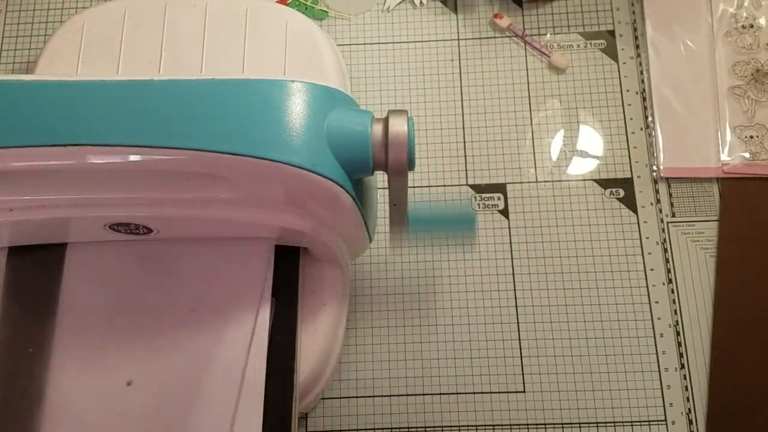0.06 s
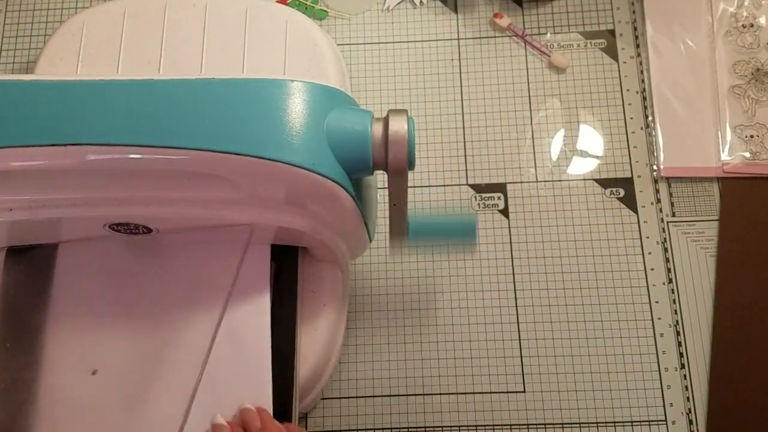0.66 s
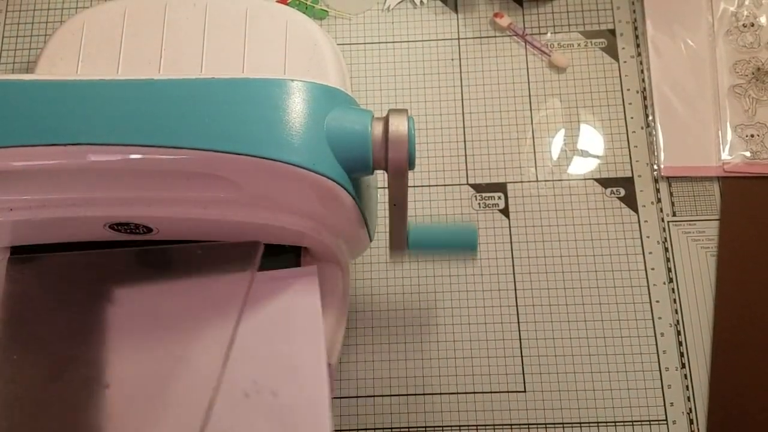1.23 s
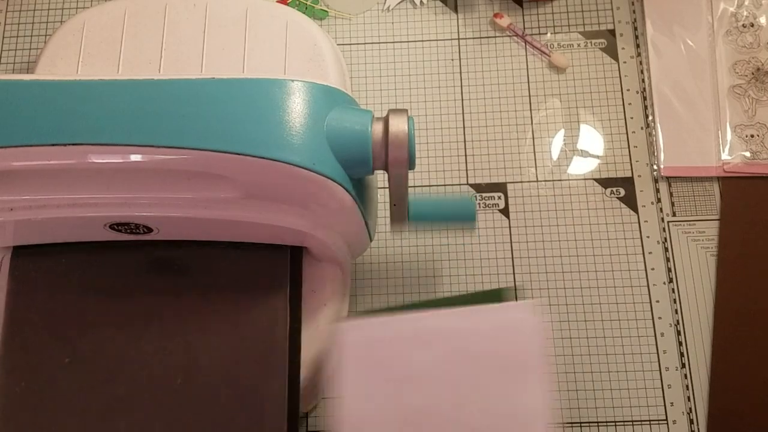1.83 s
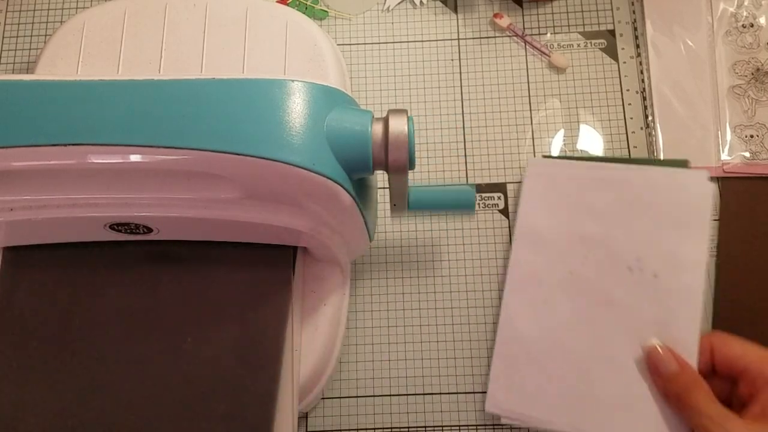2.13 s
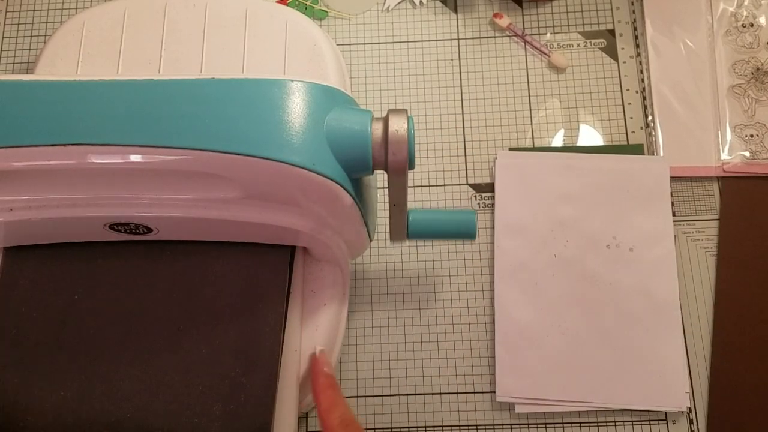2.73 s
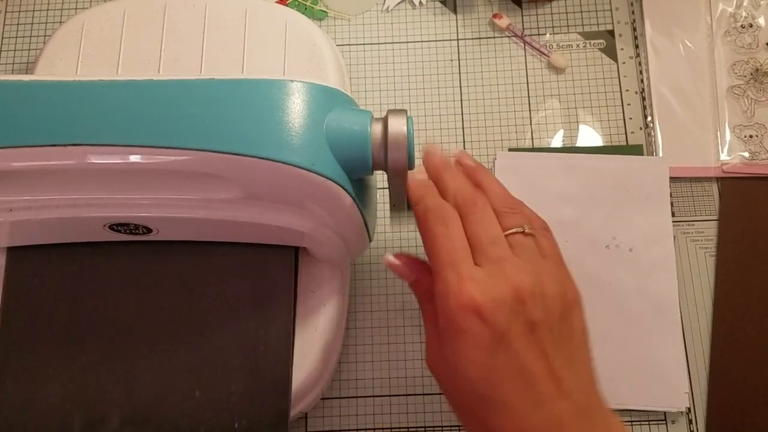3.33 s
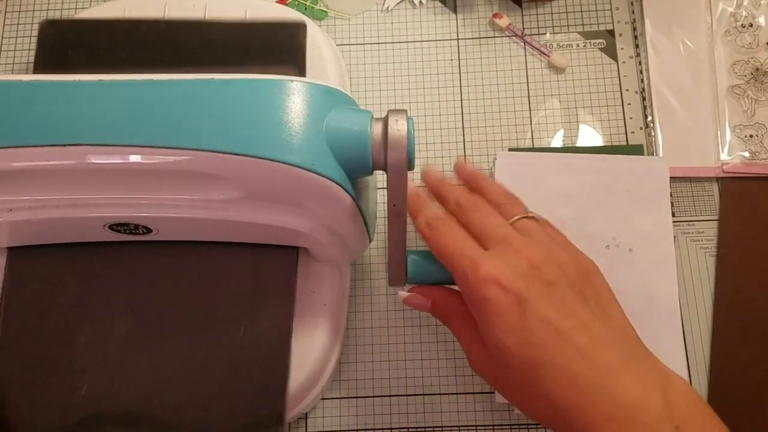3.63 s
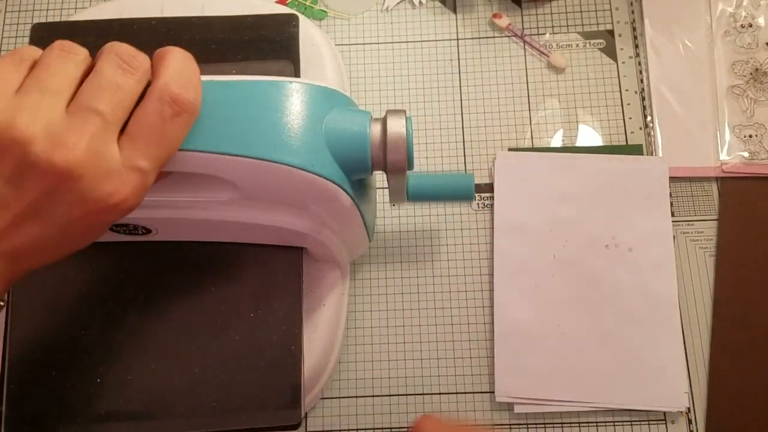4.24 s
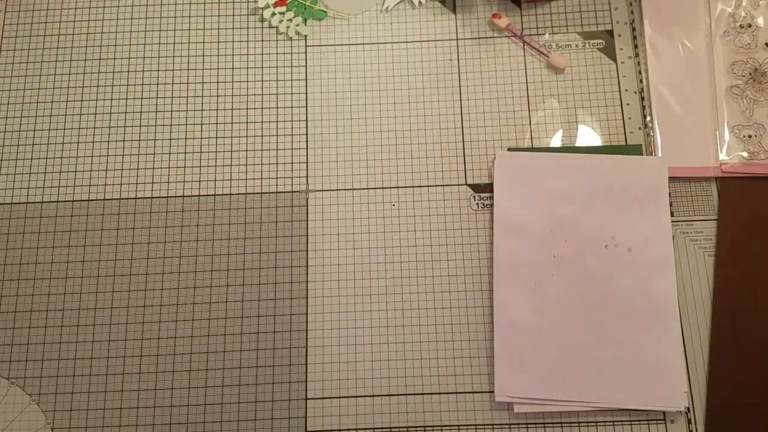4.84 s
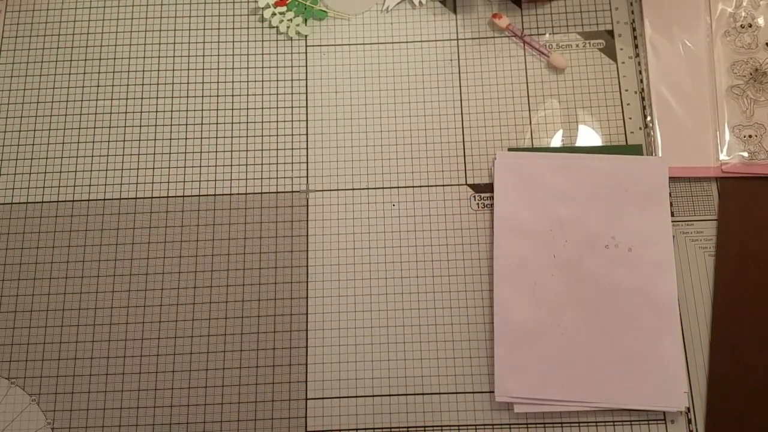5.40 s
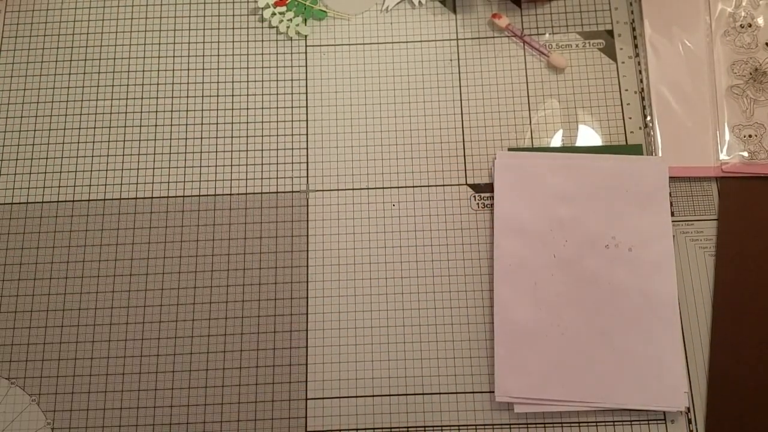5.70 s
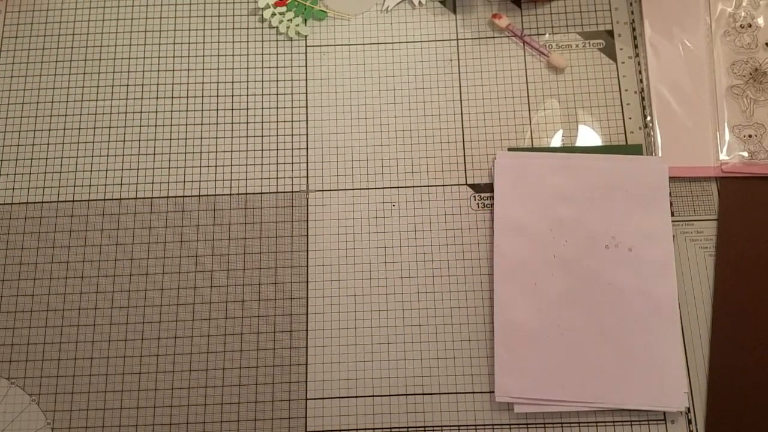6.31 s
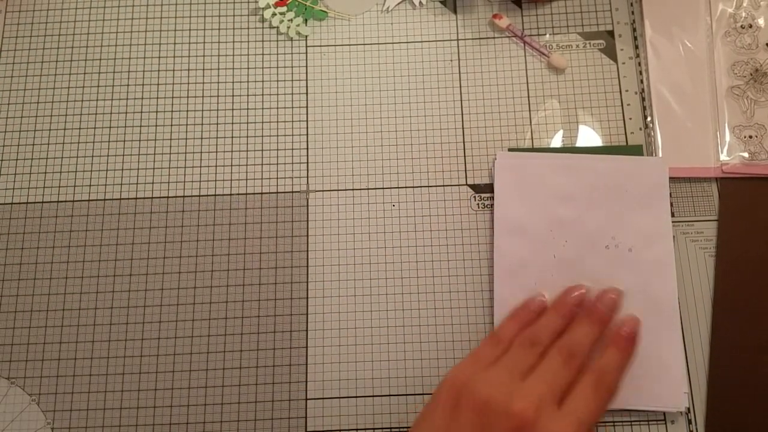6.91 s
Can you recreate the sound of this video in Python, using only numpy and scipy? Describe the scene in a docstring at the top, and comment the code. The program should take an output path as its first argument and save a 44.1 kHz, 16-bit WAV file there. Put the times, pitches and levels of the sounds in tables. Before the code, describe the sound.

A small hand-cranked die-cutting machine knocks and rattles as plates slide through, then is lifted and set down with a hollow clunk.

```python
"""A small hand-cranked die-cutting machine on a craft table in a furnished room.
Gear teeth knock the housing and the loose crank rattles as plates slide through the rollers in strokes.
Near 1.7 s card swishes out of the tray; near 3.5 s a plate drags, the housing groans, the table hums.
From 4.5 s the machine is lifted and carried to the left, rumbling in the hands.
It touches down at 5.65 s and lands foot by foot with a hollow clunk at 5.9 s; light clicks follow."""
import sys
import numpy as np
from scipy import signal
from scipy.fft import rfft, irfft
from scipy.io import wavfile
from scipy.ndimage import uniform_filter1d

SR = 44100
rng = np.random.default_rng(int(sys.argv[2]) if len(sys.argv) > 2 else 0)


def generate_wav(sig):
    """Save sig (samples, or channels by samples) to the path in sys.argv[1] as 16-bit PCM at SR."""
    pcm = np.round(np.clip(np.atleast_2d(sig).T, -1, 1) * 32767).astype(np.int16)
    wavfile.write(sys.argv[1], SR, pcm)


N = 307004
TIME = np.arange(N) / SR
RING_TIME = TIME[:SR // 2]
CUTOFF_HZ = 16000

# bass, body, edge, treble (the order of every weight_db): low/Hz, high/Hz, centre/Hz
REGISTERS = [(28, 300, 200), (300, 1400, 700), (1400, 4500, 2500), (4500, 17000, 9000)]
# left-right coherence of near and of diffuse sound: f/Hz, coherence/1
NEAR_COHERENCE = [(100, 0.92), (300, 0.93), (600, 0.75), (1200, 0.43), (2500, 0.27), (6000, 0.71),
                  (14000, 0)]
ROOM_COHERENCE = [(100, 0.92), (300, 0.81), (600, 0.87), (1000, 0), (14000, 0.02)]


def gear_knocks():
    """The housing knocks as gear teeth take up their slack or the machine is gripped."""
    # t/s, level/dB, tilt/(dB/oct), tone/Hz, tone gain/dB, t60/s
    hits = [(0.046, -35.5, 0, 780, -4, 0.07), (0.246, -34.5, 0, 1074, 3, 0.046),
            (0.585, -33.5, 1, 1014, -9, 0.1), (0.623, -39, 2.5, 1020, 17, 0.085),
            (0.901, -30, 0, 1060, 8.5, 0.11), (0.927, -32.5, -0.5, 875, 3, 0.043),
            (1.161, -34, 1, 696, -14, 0.092), (1.267, -33.5, 2.5, 512, 15, .056),
            (1.357, -33, -6, 573, 4.5, 0.041), (1.449, -31, -.3, 1120, 5, 0.055),
            (1.76, -33, 1.5, 680, 2, 0.099), (1.82, -45, -4, 690, 1, 0.12),
            (1.927, -32, 1.5, 704, 10.5, 0.087), (2.037, -42, 1, 1040, 8, 0.065),
            (2.175, -45, 4.5, 1350, 11, 0.093), (2.603, -46, 4.5, 1000, -4, 0.08),
            (2.643, -32, -1, 550, 0, 0.072), (2.68, -50, -1, 456, 4, .05),
            (2.843, -35.5, 0.5, 510, 12.5, 0.08), (2.899, -38, -1, 636, 7, 0.13),
            (4.107, -30, 1, 1300, 10, 0.044), (4.51, -34.5, 1, 543, 4.5, 0.06),
            (4.716, -31, 5, 535, 19.5, 0.048)]
    # f/Hz, level/dB, t60/s
    modes = [(320, -5.5, 0.075), (449, 9.5, 0.32), (595, 10, 0.1), (802, 7.5, 0.1), (889, 2.5, 0.098),
             (1066, 4.5, 0.14), (1176, -0.5, 0.031), (1684, 1, 0.09), (1885, 4, 0.15), (2405, 3, 0.033),
             (3500, -3.5, 0.069)]
    return blows(hits, modes, KNOCK_SPECTRUM, weight_db=(-6, 0, -7, -23), max_t60_s=0.065, crowd_db=-2.5,
                 attack_s=0.00081, spread_rad=0.25, tone_q=8, dispersion_s=0.001006, snap_db=-2)


def crank_rattle():
    """The loose crank knocks on its shaft."""
    # t/s, level/dB, tilt/(dB/oct), tone/Hz, tone gain/dB, t60/s
    hits = [(0.001, -37, 1, 985, 5.5, 0.25), (0.322, -37.5, -1.5, 1060, 5, 0.11),
            (0.341, -40, -3, 1060, 8, .08), (0.382, -40.5, -0.5, 990, 5, 0.033),
            (0.954, -33, -.5, 1020, 9, 0.044), (2.39, -36.5, -1, 1106, 10.5, 0.083),
            (3.058, -45.5, 3, 1040, 11, 0.042), (3.173, -55.5, -1, 980, 9, 0.048),
            (3.212, -23.5, -.5, 964, 12, 0.11), (3.477, -44.5, 2, 644, 6, 0.33),
            (3.515, -47, 2, 600, 3, 0.3), (3.539, -29, -2, 1090, 11, 0.07),
            (3.642, -36.5, 0.5, 850, 7, 0.044), (4.376, -41.5, 1, 946, -9, 0.042),
            (4.42, -36, -1.5, 910, 7, 0.047)]
    # f/Hz, level/dB, t60/s
    modes = [(290, -24, 0.093), (346, -14.5, 0.09), (456, -2, 0.095), (638, -3, 0.074), (880, 6, 0.025),
             (971.5, -6, 0.1), (1063.5, -2.5, 0.08), (1280, -15, 0.024), (1670, -11, 0.056),
             (2530, -12, 0.1), (3480, -11, 0.054)]
    return blows(hits, modes, KNOCK_SPECTRUM, weight_db=(-9.5, -4, -9.5, -19.5), max_t60_s=0.085,
                 crowd_db=-1, attack_s=0.001, spread_rad=0.26, tone_q=8.1, dispersion_s=0.0006,
                 snap_db=19)


def landing_clunk():
    """The machine touches down, then lands foot by foot and rings as a whole."""
    # t/s, level/dB, tilt/(dB/oct), tone/Hz, tone gain/dB, t60/s
    hits = [(5.653, -32, 3, 835, 7, 0.14), (5.663, -34, 0, 650, 11, .12),
            (5.911, -35.5, -6.5, 330, 0, 0.055), (5.920, -18, 0, 943, 4, 0.12),
            (5.927, -19, -1.5, 516, 4, 0.091), (5.947, -22, 1.5, 1600, 6.5, 0.21)]
    # f/Hz, level/dB, t60/s
    modes = [(314, -7.5, 0.16), (362, -7, 0.076), (402, -22, 0.37), (513.6, -11.5, 0.3), (768, -13, 0.32),
             (872, -10, 0.33), (933, -13, 0.28), (1022, -12, 0.44), (1143, -16, 0.74), (1260, -8, 0.25),
             (1340, -28, 0.82), (1506, -12, 0.28), (1644, -2.5, 0.12), (1860, -16, 0.27), (2090, -14, 0.27),
             (2280, -22, 0.31), (2440, -16, 0.25), (2660, -13, 0.15), (3327, -22, 0.27), (3470, -16, 0.21)]
    # crowded modes: f/Hz, level/dB
    spectrum = [(30, -3.5), (80, -36), (230, -6), (700, -6), (1600, -5), (2700, -7.5), (4200, -20.5),
                (9500, -22), (16000, -40)]
    return blows(hits, modes, spectrum, weight_db=(-9.5, 2.5, -3, -18), max_t60_s=0.16, crowd_db=6,
                 attack_s=0.0017, spread_rad=0.62, tone_q=8, dispersion_s=0.001, snap_db=-19)


def plate_clicks():
    """Plate edges, card and fingernails click: mostly crowded modes, with a broad tone."""
    # t/s, level/dB, tilt/(dB/oct), tone/Hz, tone gain/dB, t60/s
    hits = [(0.108, -47, 3.5, 1100, 2, 0.046), (0.304, -54, 0.5, 3000, -8, 0.044),
            (0.364, -40.5, -0.5, 930, 9.5, 0.08), (0.432, -51, 3.5, 1080, 10, 0.082),
            (0.525, -54.5, -1.5, 2150, 7, 0.13), (0.869, -45, 0, 4470, -17, 0.056),
            (1.036, -47, -0.5, 2300, 16, 0.045), (1.225, -36, .5, 3200, 7, 0.04),
            (1.263, -36.5, 0, 2930, 1, 0.017), (1.479, -61, 6, 3880, -4, 0.043),
            (1.493, -46, 1.5, 3480, -17, .025), (2.058, -41.5, -2, 1500, -1, 0.078),
            (2.142, -47.5, 0.5, 2400, 3, 0.033), (2.262, -46, 5, 9000, 2, 0.026),
            (2.272, -37.5, 4.5, 9250, 6, 0.065), (2.31, -39, 1.3, 10400, 9, 0.033),
            (2.338, -42, -8, 2000, 1, 0.033), (2.603, -45, -0.5, 3200, 8, 0.052),
            (2.617, -42.5, -1.5, 1300, -11, .04), (3.212, -36, 13, 9250, -11, 0.069),
            (3.297, -54, 14, 10100, 3, 0.034), (3.583, -35, 3.5, 4030, -3, 0.07),
            (3.933, -28.5, 3, 3930, -8, 0.053), (4.063, -34, 2.5, 2100, 6.5, 0.055),
            (4.107, -29.5, 0, 1220, 2.5, 0.052), (4.183, -43.5, -1.5, 3240, -3, 0.038),
            (4.504, -47, 2, 1580, 6, 0.048), (4.628, -53, 0, 2300, -1, 0.054),
            (4.646, -59, 2, 2400, 1, .04), (4.693, -47.5, 0, 2400, 12, 0.093),
            (4.795, -40, 3.5, 1900, 14, 0.1), (5.558, -42, 4, 10500, -2, 0.069),
            (5.783, -47.5, 0.5, 11700, 1, 0.046), (6.523, -54.5, 1, 4100, -22, 0.2),
            (6.888, -37, 4, 10000, 3.5, 0.089)]
    # f/Hz, level/dB, t60/s
    modes = [(620, -8, .025), (1050, -3, .03), (2100, -4, .02), (2750, -3, .02), (3300, -7, .012),
             (4250, -6, .012), (5400, -4, .015)]
    # crowded modes: f/Hz, level/dB
    spectrum = [(100, -16), (400, -6), (1000, 0), (1600, -5), (2300, -1), (3300, -1), (4300, -1), (5400, 1),
                (7500, -10), (10500, -7), (16000, -8)]
    return blows(hits, modes, spectrum, weight_db=(-14, 1.5, 0, -7), max_t60_s=0.028, crowd_db=11,
                 attack_s=0.00024, spread_rad=0.66, tone_q=2.5, dispersion_s=0.0004, snap_db=3.5)


def blows(hits, modes, spectrum, weight_db, max_t60_s, crowd_db, attack_s, spread_rad, tone_q,
          dispersion_s, snap_db):
    """Each blow rings a body's clear modes and a crowd of others; its contact sets tilt and tone."""
    size = len(RING_TIME)
    hz, mode_db, t60_s = np.transpose(modes)[:, :, None]
    crowd = stereo_noise(spectrum, NEAR_COHERENCE)
    damped_t60_s = np.minimum(t60_s, max_t60_s)  # plastic and rubber limit the ring
    swing = np.exp(2j * np.pi * hz * RING_TIME) * fade(RING_TIME, damped_t60_s)
    # bending waves: lows travel slower, so a knock falls in pitch
    bins_hz = np.maximum(np.fft.rfftfreq(size, 1 / SR), 1)
    delay_s = dispersion_s * 1200 / (bins_hz + 200)
    bending = np.exp(-2j * np.pi * np.cumsum(delay_s) * SR / size)
    rings = []
    for *_, crowd_t60_s in hits:
        # each blow lands on another spot and favours other modes
        strength = from_db(mode_db.T + 2.5 * rng.standard_normal(len(modes)))
        phase = rng.uniform(0, 2 * np.pi, len(modes))
        # higher modes reach the two microphones less in step
        phase = phase + spread_rad * np.sqrt(hz.T / 1000) * rng.standard_normal((2, len(modes)))
        clear = ((strength * np.exp(1j * phase)) @ swing).imag
        start = rng.integers(N - size)
        snap = from_db(snap_db) * fade(RING_TIME, 0.0017)
        dense = crowd[:, start:start + size] * (fade(RING_TIME, crowd_t60_s) + snap)
        ring = (peak_one(clear) + from_db(crowd_db) * peak_one(dense)) * onset(attack_s)
        rings.append(irfft(rfft(ring) * bending, size))
    split = [band(np.array(rings), (low, high), order=3) for low, high, _ in REGISTERS]
    out = np.zeros((2, N))
    for (t_s, level_db, tilt, tone_hz, tone_db, _), *parts in zip(hits, *split):
        sound = sum(gain * peak_one(part) for gain, part in zip(register_gains(weight_db, tilt), parts))
        tone = signal.lfilter(*signal.iirpeak(tone_hz, tone_q, fs=SR), sound)
        sound = peak_one(sound + from_db(tone_db) * tone)
        add(out, t_s - attack_s / 2 - dispersion_s / 2, from_db(level_db) * sound)
    return out


def table_bumps():
    """Soft, heavy contacts on table and floor: one panel mode, a dull thud and the table's sway."""
    # t/s, level/dB, f/Hz, t60/s
    hits = [(0.923, -54, 169, 0.14), (1.267, -36.5, 126, 0.23), (1.297, -33.5, 127.6, 0.25),
            (1.928, -38.5, 275, 0.058), (2.309, -37.5, 230, 0.082), (2.641, -44, 212, 0.11),
            (3.214, -46.5, 137.6, 0.26), (3.553, -43, 130.6, 0.47), (4.509, -37, 242, 0.022),
            (4.54, -44.5, 133, 0.076), (4.707, -32, 394, 0.035), (4.712, -42, 132, 0.13),
            (4.802, -36, 135, 0.046), (4.92, -39, 130, 0.059), (5.265, -33, 125.4, 0.12),
            (5.414, -43, 138, 0.075), (5.922, -26, 230, 0.098), (6.136, -46.5, 139, 0.32),
            (6.177, -43.5, 420, 0.046), (6.267, -43.5, 148, 0.024), (6.326, -43.5, 323, 0.052),
            (6.368, -55, 350, .04)]
    heaviest_db = max(hit[1] for hit in hits)
    sway = damped_sine(hz=42, t60_s=0.44)
    out = np.zeros(N)
    for t_s, level_db, hz, t60_s in hits:
        burst = rng.standard_normal(len(RING_TIME)) * fade(RING_TIME, 0.07)
        thud = from_db(-6) * peak_one(band(burst, (hz / 2, hz * 1.39)))
        rocking = from_db(-20 + (level_db - heaviest_db) / 2) * sway
        sound = (peak_one(damped_sine(hz, t60_s)) + thud + rocking) * onset(0.0042)
        add(out, t_s, from_db(level_db) * peak_one(sound))
    return np.array([out, out])


def sliding():
    """Friction of plates, card, rollers and hands: strokes and rumble judder, scrapes run evenly."""
    # plate, card or hand slides: fastest at t/s, rise/s, fall/s, level/dB, tilt/(dB/oct)
    strokes = [(0, .03, 0.16, -45.5, -5), (0.428, .05, 0.17, -70.5, 5.5), (0.75, 0.049, 0.053, -60.5, 2),
               (1.04, 0.022, 0.018, -68, 4), (1.13, 0.26, 0.21, -54, 1.5), (1.45, 0.21, 0.79, -59.5, -1.5),
               (1.686, 0.14, .13, -53.5, 3), (2.11, 0.063, 0.16, -52, -1.7),
               (2.303, 0.058, 0.1, -49.5, 0.5), (2.579, 0.018, 0.07, -60.5, 0),
               (2.88, 0.062, 0.054, -49.5, -2.5), (3.08, 0.087, 0.063, -56, -2),
               (3.591, 0.12, 0.12, -45.5, 0.35), (4.16, 0.099, 0.061, -56.5, 1.5),
               (4.67, 0.074, 0.18, -53, -3.5), (5.031, 0.054, 0.063, -51.5, -2.5),
               (5.329, 0.027, 0.058, -50, 0), (5.46, .08, .1, -70, 0), (5.664, 0.032, 0.035, -40.5, -1),
               (5.96, 0.039, 0.12, -39.5, -4), (6.11, 0.08, 0.11, -67, 3.5), (6.29, 0.087, 0.1, -73.5, 3.5),
               (6.179, 0.039, 0.024, -48, -4), (6.74, 0.075, 0.15, -61.5, -0.5),
               (6.93, 0.031, 0.18, -60, 4.5)]
    # rollers under load: t/s, level/dB
    grinding = [(0.0, -56), (0.23, -55.5), (0.4, -48.5), (0.54, -73), (0.67, -51), (0.82, -66.5),
                (0.98, -60), (1.08, -76), (1.37, -55.5), (1.52, -57), (1.68, -63.5), (2.25, -78),
                (2.38, -70), (3.21, -61), (3.42, -62.5), (3.55, -34), (3.76, -67), (4.4, -75)]
    # machine rumbling in the hands: t/s, level/dB
    carrying = [(4.4, -57), (4.63, -54.5), (4.86, -49), (5.02, -57.5), (5.3, -52), (5.45, -42),
                (5.6, -49.5), (5.9, -49), (6.15, -51), (6.35, -60.5), (6.64, -56.5), (6.88, -52.5),
                (6.96, -50)]
    # shoved plate or dragged edge: t/s, length/s, level/dB, fade/(dB/s), tilt/(dB/oct)
    scrapes = [(3.22, 0.33, -52.5, 7, -1), (3.487, 0.38, -55, 31, 1.5), (5.552, .225, -43, 47, 1.7),
               (5.775, 0.17, -47, 48, 2.5)]
    slide_weight_db, swell_db, roundness = (-15.5, 0, -0.5, -5), 15.5, 1.34
    friction = friction_noise()
    power = np.zeros((len(REGISTERS), N))
    for t_s, rise_s, fall_s, level_db, tilt in strokes:
        t = np.arange(-min(2 * rise_s, t_s), 2 * fall_s, 1 / SR)
        envelope = from_db(level_db - swell_db * np.maximum(-t / rise_s, t / fall_s) ** roundness)
        add(power, t_s + t[0], np.outer(register_gains(slide_weight_db, tilt), envelope) ** 2)
    for curve, weight_db in (grinding, (-16, -2.5, -13, -26)), (carrying, (-7, -5.5, -13, -21)):
        level_db = np.interp(TIME, *np.transpose(curve), left=-np.inf, right=-np.inf)
        power += np.outer(from_db(weight_db), from_db(level_db)) ** 2
    judder = rms_one(from_db(0.5 * drift(rate_hz=37)))
    power *= judder ** 2
    for t_s, length_s, level_db, fade_db_per_s, tilt in scrapes:
        release = fade(np.maximum(RING_TIME - length_s, 0), t60_s=0.6)
        envelope = onset(0.005) * release * from_db(level_db - fade_db_per_s * RING_TIME)
        add(power, t_s, np.outer(register_gains(slide_weight_db, tilt), envelope) ** 2)
    parts = [rms_one(band(friction, (low, high), order=3)) for low, high, _ in REGISTERS]
    return sum(gain * part for gain, part in zip(np.sqrt(power), parts))


def friction_noise(snags_per_s=55, snag_db=2.5, snag_t60_s=0.0018, grain_db=1.5):
    """Rubbing noise with a fine grain and sparse snags."""
    # f/Hz, level/dB
    spectrum = [(18, -41), (30, -39), (131, 5), (210, -11), (319, -4.5), (449, -9.5), (499, -8),
                (1010, -14.5), (1320, -22), (3140, -24), (3870, -32.5), (7670, -30), (11700, -26),
                (14400, -26), (16000, -60)]
    snags = (rng.random(N) < snags_per_s / SR) * rng.uniform(0.2, 1, N)
    crackle = signal.lfilter([from_db(snag_db)], [1, -fade(1 / SR, snag_t60_s)], snags + 1e-18)
    noise = stereo_noise(spectrum, NEAR_COHERENCE, flicker_db=4)
    grain = from_db(grain_db * drift(rate_hz=540))
    return noise * grain * (1 + crackle)


def rubbed_tones():
    """Friction drives resonances of card, housing and table: narrow noise bands that follow a pitch."""
    # each: t/s, f/Hz, level/dB
    card_swish = [(1.599, 1410, -83), (1.666, 1150, -73), (1.689, 968, -50.5), (1.729, 886, -52),
                  (1.78, 745, -102)]
    housing_groan = [(3.34, 470, -69), (3.385, 416, -53), (3.425, 360.5, -54), (3.465, 458, -59),
                     (3.485, 601.5, -47), (3.53, 565, -43), (3.57, 621, -44), (3.615, 480, -50),
                     (3.68, 457, -68)]
    table_hum = [(3.35, 128, -72), (3.39, 127.6, -58), (3.5, 128, -58), (3.54, 128, -66)]
    out = np.zeros(N)
    for curve, width_hz in (card_swish, 560), (housing_groan, 110), (table_hum, 25):
        t_s, hz, level_db = np.transpose(curve)
        phase = 2 * np.pi * np.cumsum(np.interp(TIME, t_s, hz)) / SR
        noise = rms_one(drift(width_hz) * np.cos(phase) + drift(width_hz) * np.sin(phase))
        active = (TIME > t_s[0]) & (TIME < t_s[-1])
        out += noise * from_db(np.interp(TIME, t_s, level_db)) * active
    return out


def plastic_ticks():
    """Tiny bright snaps of plastic close to the microphones."""
    # t/s, level/dB, low edge/Hz, left over right/dB
    hits = [(3.212, -45, 8900, -3), (3.586, -40.5, 6000, 4), (3.664, -42, 8000, 0), (3.739, -37, 2000, 2.5),
            (4.108, -41.5, 3000, 1), (4.795, -48.5, 3600, 2), (5.558, -36, 7500, 3), (5.782, -44, 8000, 5),
            (6.131, -52, 3180, 13), (6.524, -48.5, 3600, 4), (6.89, -41, 7000, -8)]
    out = np.zeros((2, N))
    for t_s, level_db, low_hz, left_db in hits:
        burst = rng.standard_normal((2, len(RING_TIME))) * fade(RING_TIME, 0.0094)
        snap = peak_one(band(burst, (low_hz, CUTOFF_HZ)))
        add(out, t_s, from_db(level_db) * snap * from_db([[left_db / 2], [-left_db / 2]]))
    return out


def edge_pings():
    """A flicked thin edge rings briefly in one mode."""
    # t/s, level/dB, f/Hz
    flicks = [(0.868, -50, 4400), (1.225, -42, 3080), (2.178, -42.5, 2020), (4.628, -43.5, 2240),
              (6.131, -49, 4260), (6.524, -48, 4320)]
    out = np.zeros(N)
    for t_s, level_db, hz in flicks:
        add(out, t_s, from_db(level_db) * peak_one(damped_sine(hz, t60_s=0.024)))
    return out


def room_echoes(x, build_s=0.0088):
    """Each channel excites its own diffuse reflections, which build quickly and die band by band."""
    # f/Hz, level/dB
    spectrum = [(60, 7.5), (200, 10.5), (500, 2), (1200, -6), (3200, -3.5), (5400, -7), (8000, 1),
                (14000, -9.5)]
    # f/Hz, t60/s
    decay = [(80, 0.54), (200, 0.22), (500, 0.29), (1500, 0.46), (5000, 0.43), (14000, 0.19)]
    size = 2 * len(RING_TIME)
    build = 1 - np.exp(-(TIME[:size] / build_s) ** 2)
    out = np.zeros((2, N))
    for channel in x:
        tail = rms_one(stereo_noise(spectrum, ROOM_COHERENCE, size, decay) * build)
        out += signal.fftconvolve(channel[None], tail, axes=1)[:, :N]
    return out / np.sqrt(2 * size)


def room_air():
    """Faint steady noise of the still room."""
    # f/Hz, level/dB
    spectrum = [(15, -30), (25, -1), (48, 5), (344, -3.5), (394, -6), (451, -16), (531, 39), (591, -35),
                (1330, -10), (2160, -13), (7510, -27), (14800, -20), (16000, -36)]
    return from_db(-64) * stereo_noise(spectrum, ROOM_COHERENCE)


def stereo_noise(spectrum, coherence, size=N, decay=None, flicker_db=0):
    """Half-octave noise bands, each with its own level, coherence and optional decay or flicker."""
    edges_hz = np.geomspace(24, 17500, 20)
    white, out = rng.standard_normal((2, 2, size)), 0
    for k, (low, high) in enumerate(zip(edges_hz, edges_hz[1:])):
        hz = np.sqrt(low * high)
        mid, side = band(white[k % 2], (low, high))
        alike = at_hz(coherence, hz)
        gain = from_db(at_hz(spectrum, hz))
        if decay is not None:
            gain = gain * fade(TIME[:size], at_hz(decay, hz))
        if flicker_db:
            gain = gain * from_db(flicker_db * drift(rate_hz=50))
        out = out + gain * (np.sqrt(1 + alike) * mid + np.sqrt(1 - alike) * side * [[1], [-1]])
    return rms_one(out)


def register_gains(weight_db, tilt_db_per_oct, pivot_hz=1400):
    """Harder or faster contact tilts the four registers towards the treble."""
    octaves = np.log2(np.array(REGISTERS)[:, 2] / pivot_hz)
    return from_db(np.array(weight_db) + tilt_db_per_oct * octaves)


def from_db(db):
    """Decibels to gain."""
    return 10 ** (np.asarray(db) / 20)


def rms_one(x):
    """Scale to unit power."""
    return x / np.sqrt(np.mean(x ** 2) + 1e-20)


def peak_one(x):
    """Scale the loudest 5 ms of the channel mean to unit power."""
    mid = np.atleast_2d(x).mean(axis=0)
    return x / np.sqrt(uniform_filter1d(mid ** 2, size=220).max() + 1e-20)


def at_hz(points, hz):
    """Read a table on a log-frequency axis."""
    points = np.array(points)
    return np.interp(np.log(hz), np.log(points[:, 0]), points[:, 1])


def onset(attack_s):
    """Exponential rise to 1."""
    return 1 - np.exp(-RING_TIME / attack_s)


def fade(t, t60_s):
    """Exponential decay, 60 dB in t60_s."""
    return np.exp(-np.log(1000) * t / t60_s)


def damped_sine(hz, t60_s):
    """One freely ringing mode."""
    return np.sin(2 * np.pi * hz * RING_TIME) * fade(RING_TIME, t60_s)


def band(x, edges_hz, order=2):
    """Butterworth band-pass."""
    return signal.sosfilt(signal.butter(order, edges_hz, "band", fs=SR, output="sos"), x)


def drift(rate_hz):
    """Random curve through unit-normal knots."""
    knots = rng.standard_normal(int(N / SR * rate_hz) + 2)
    return np.interp(TIME * rate_hz, np.arange(len(knots)), knots)


def add(track, t_s, sound):
    """Mix a sound in at t_s."""
    start = max(round(t_s * SR), 0)
    track[..., start:start + sound.shape[-1]] += sound[..., :max(N - start, 0)]


def place(x, left_db, lead_ms=0):
    """The left microphone hears the source louder and, given a lead, earlier."""
    right = np.interp(TIME - lead_ms / 1000, TIME, x[1])
    return np.array([x[0] * from_db(left_db / 2), right * from_db(-left_db / 2)])


def scene():
    """The machine works just left of the microphones, then moves farther left; impacts wake the room."""
    # path of the carried machine: t/s, left lead/ms
    path = [(4.5, 0.038), (5.0, 0.13), (5.55, 0.27), (6.1, 0.39), (6.4, 0.091)]
    lead_ms = np.interp(TIME, *np.transpose(path))
    knocks = gear_knocks() + crank_rattle()
    clicks = plate_clicks() + edge_pings()
    landing = landing_clunk()
    bumps = table_bumps()
    rubbing = sliding() + rubbed_tones()
    near = place(knocks, left_db=3.5, lead_ms=0.076) + place(clicks, left_db=1.5, lead_ms=0.0544)
    near += place(bumps, left_db=3) + plastic_ticks()
    moving = place(landing, left_db=3.5, lead_ms=lead_ms) + place(rubbing, left_db=3, lead_ms=lead_ms)
    send = (from_db(-13) * knocks + from_db(-11.5) * clicks
            + from_db(-17.5) * bumps + from_db(-10.5) * landing)
    return near + moving + place(room_echoes(send), left_db=2) + room_air()


def record(dry):
    """The microphones lose the deepest bass; the top is cut steeply."""
    thin = signal.sosfilt(signal.butter(2, 31, "high", fs=SR, output="sos"), dry)
    return signal.sosfilt(signal.ellip(10, 0.1, 80, CUTOFF_HZ, fs=SR, output="sos"), thin)


# crowded modes of housing and crank: f/Hz, level/dB
KNOCK_SPECTRUM = [(80, -46), (250, -14.5), (550, -14), (1100, -6.5), (1900, -4), (2600, -12), (3600, -16),
                  (6000, -28), (10000, -30), (16000, -52)]

dry = scene()
out = record(dry)
generate_wav(out)
```